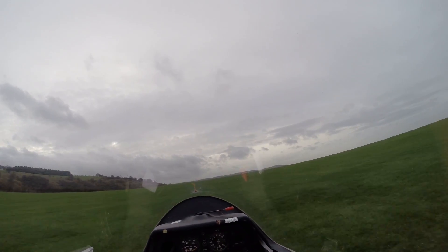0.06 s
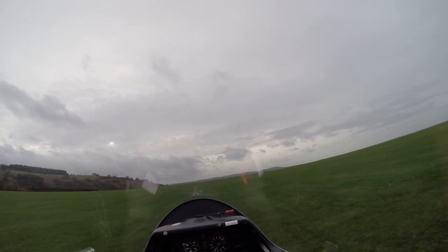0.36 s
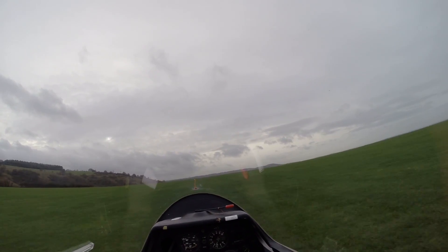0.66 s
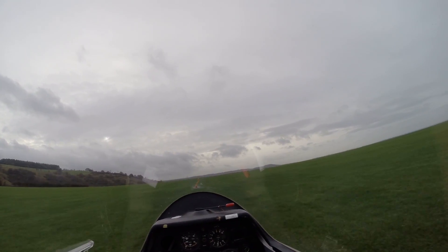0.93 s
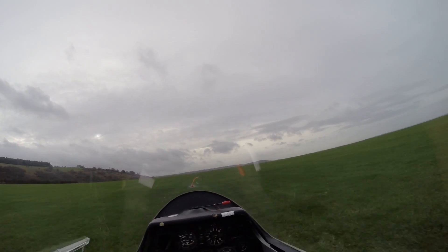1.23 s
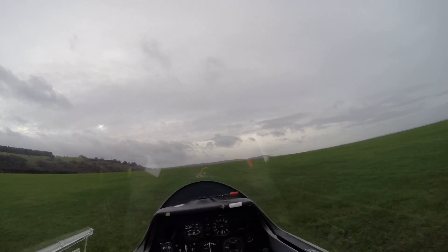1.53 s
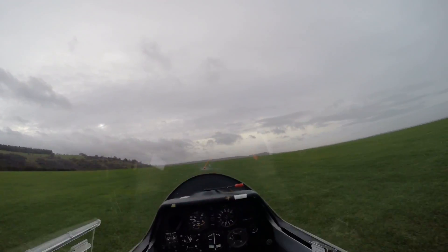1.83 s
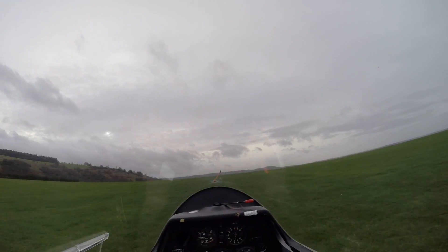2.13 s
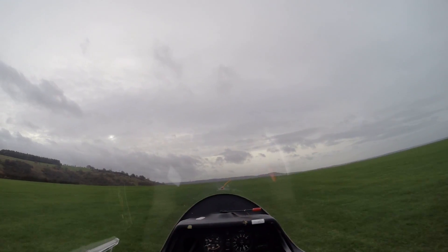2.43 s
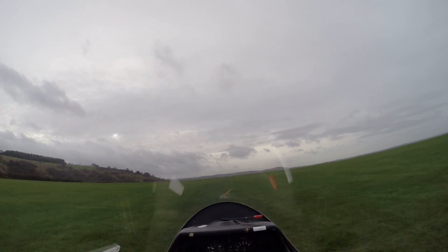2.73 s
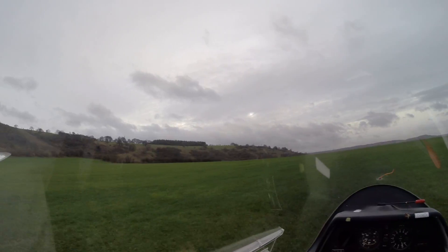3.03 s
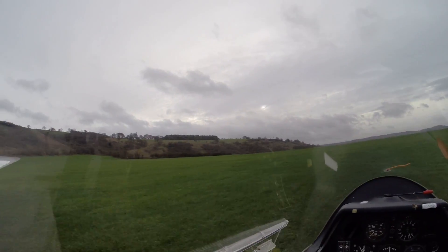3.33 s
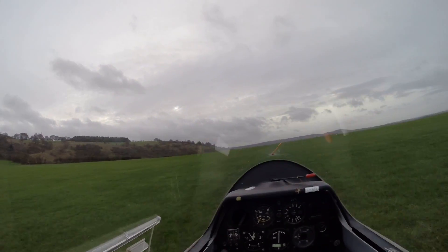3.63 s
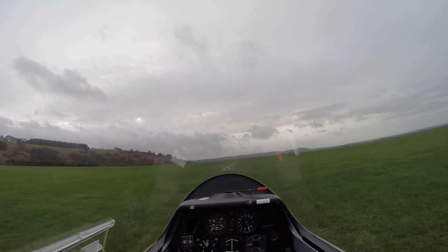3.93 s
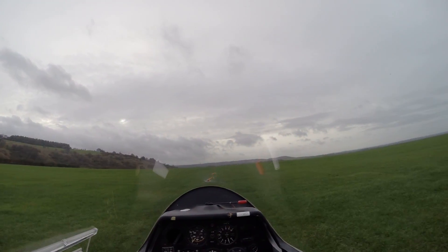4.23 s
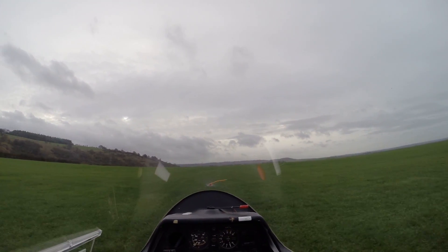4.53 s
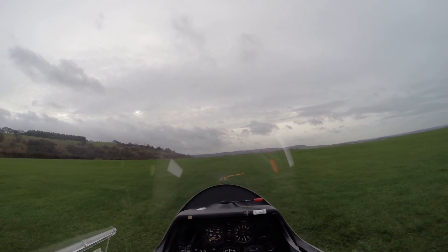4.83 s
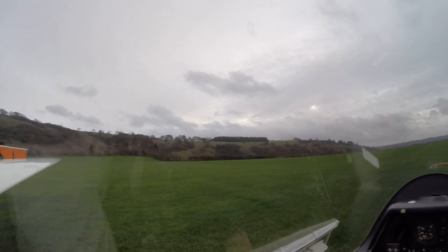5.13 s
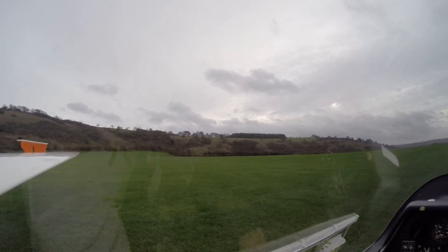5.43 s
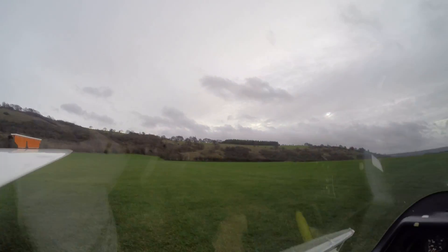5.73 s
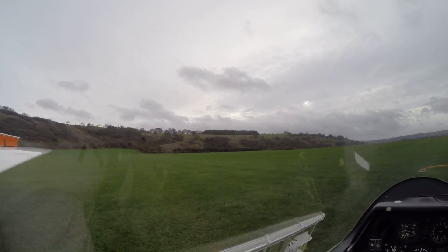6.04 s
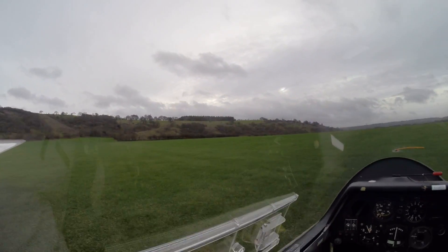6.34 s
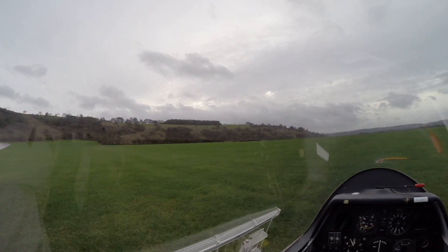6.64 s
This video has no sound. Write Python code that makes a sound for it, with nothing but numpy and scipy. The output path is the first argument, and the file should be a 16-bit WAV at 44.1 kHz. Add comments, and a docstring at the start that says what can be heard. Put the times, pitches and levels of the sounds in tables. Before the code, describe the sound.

A glider judders over turf, skips clear for a moment and settles back with deep thumps and a hollow drone, heard close up from the cockpit. Irregular clacks, dull knocks and small metallic ticks come from the canopy and loose parts, over a soft hiss of air. The bumps gradually become lighter as it slows, and grass rubs the underside near the end while the rattling carries on.

```python
"""Glider rolling over grass

Heard from the cockpit, the wheel rolls slowly over an airfield and shakes the hollow body (the
fuselage), which rumbles and booms over the bumps. Loose fittings chatter, the control linkage knocks
and the canopy frame clacks. Grass rubs along the belly, and air hisses softly past."""
import sys
import numpy as np
from scipy import signal
from scipy.io import wavfile
from scipy.ndimage import uniform_filter1d

SR = 44100
rng = np.random.default_rng(int(sys.argv[2]) if len(sys.argv) > 2 else 0)


def store_wav(level_fs):
    """Save 16-bit WAV to argv[1]."""
    pcm = np.round(np.clip(np.atleast_2d(level_fs), -1, 1) * 32767)
    wavfile.write(sys.argv[1], SR, pcm.T.astype(np.int16))


N = 294147

# A law says how a part follows the shaking: (level at SHAKE_REF_DB [dB], rise per dB of shaking [dB])
CABIN_LAW, SKIN_LAW, HEAVE_LAW = (-32, 1.02), (-36, 0.91), (-30, 0.63)
RATTLE_LAW, CLACK_LAW, KNOCK_LAW, RASP_LAW = (-47.5, 1.13), (-41.5, 0.41), (-42, 0.56), (-55, 1)
SHAKE_REF_DB = -28

# humps under the wheel: (start [s], length [s], wheel heave [dB], fuselage drone [dB], rattle [dB])
BUMPS = [(0.03, 0.51, -43, -26.5, -39), (0.52, 0.31, -45, -34, -47), (0.99, 0.16, -30.5, -33, -45.5),
         (1.27, 0.18, -18.5, -22, -47), (1.56, 0.24, -25, -22.5, -34.5), (1.9, 0.28, -23.5, -25, -44),
         (2.17, 0.25, -27, -27, -72), (2.69, 0.13, -26.5, -30.5, -38.5), (3.15, 0.15, -39, -24.5, -57),
         (3.5, 0.13, -23.5, -29.5, -44), (3.95, 0.21, -33, -29, -45), (5.48, 0.14, -28, -43, -44)]
# the broad tone of the hollow fuselage: (frequency [Hz], gain [dB])
FUSELAGE_TONE = [(45, -50.5), (78, -9.5), (105, 1.5), (135, -1), (163, -7.5), (244, -8), (320, -9.5),
                 (400, -17), (500, -18.5), (680, -27.5), (1000, -30.5), (2600, -80)]
# the notes at which it rings: (frequency [Hz], width [Hz], boost [dB])
FUSELAGE_NOTES = [(103.9, 14.6, 6.5), (123, 20, 4.5), (197, 104, 0.5), (237, 19.3, 7), (255.7, 7.8, 9.5),
                  (302, 4.7, 4), (448, 21.4, 8)]
def fuselage(tufts_per_s=260, spread_db=2.0, grit=0.03, lurch_db=1.5, cabin_top_hz=150):
    """Tufts of grass thump the tyre; the cabin booms deeply and the skin drones above it."""
    tufts = rng.random(N) < tufts_per_s / SR
    thumps = tufts * amp(spread_db * rng.standard_normal(N)) * rng.choice([-1, 1], N)
    force = thumps + grit * rng.standard_normal(N)
    drone = through(force, response(FUSELAGE_TONE, FUSELAGE_NOTES, size=16384))
    cabin = signal.sosfiltfilt(signal.butter(6, cabin_top_hz, fs=SR, output="sos"), drone)
    skin = drone - cabin
    out = np.zeros(N)
    for part, law, bump_db in (cabin, CABIN_LAW, -2), (skin, SKIN_LAW, -4):
        rolling = shaking(law) * amp(lurch_db * lurches())
        bumping = amp(bump_db) * swells(BUMPS, column=3)
        out += np.hypot(rolling, bumping) * steady(part, size=3000)  # hypot adds their powers
    return out


# the deep tone of the bouncing wheel: (frequency [Hz], gain [dB])
WHEEL_TONE = [(5, -37), (12, -1.5), (22, -3.5), (37, -1), (52, -8.5), (65, -6), (82, -14), (130, -22.5),
              (300, -87)]
def wheel(lurch_db=2.0):
    """The wheel heaves up and down over the turf, and the whole glider follows."""
    heave = through(rng.standard_normal(N), response(WHEEL_TONE, size=16384))
    rolling = shaking(HEAVE_LAW) * amp(lurch_db * lurches())
    return np.hypot(rolling, swells(BUMPS, column=2)) * steady(heave, size=4500)


# the tyre hits a hard ridge: (time [s], level [dB])
THUDS = [(1.296, -15), (1.361, -16), (1.638, -11), (1.714, -12), (1.986, -7.5), (2.329, -12.5), (3.96, -16),
         (4.926, -22), (5.543, -18), (5.934, -21), (6.199, -19)]
def thuds(hz=40, peak_s=0.012):
    """The glider bounces on its tyre for a cycle or two."""
    out, t = np.zeros(N), np.arange(SR // 4) / SR
    rise_and_fall = t / peak_s * np.exp(1 - t / peak_s)
    for s, db in THUDS:
        add(out, s, amp(db) * rise_and_fall * np.sin(2 * np.pi * hz * t))
    return out


# jolts that make the hollow shell boom: (time [s], level [dB], boosted note [Hz])
BOOMS = [(0.203, -21, 280), (0.546, -25.5, 342), (0.635, -30.5, 280), (1.274, -22.5, 219),
         (1.925, -27, 304), (2.727, -24.5, 300), (3.18, -32, 240), (3.558, -27, 286), (4.667, -36.5, 223),
         (5.489, -29, 231), (5.886, -34.5, 446), (6.012, -36, 250), (6.137, -39, 520)]
# the dull tone of the panels: (frequency [Hz], gain [dB])
PANEL_TONE = [(90, -15.5), (200, 6), (540, -3.5), (800, -14.5), (2000, -52)]
def panels(note_db=4):
    """A jolt shakes many panels at once: a hollow thump around one broad note."""
    out = np.zeros(N)
    for s, db, hz in BOOMS:
        body = response(PANEL_TONE, [(hz, hz / 2, note_db)])
        add(out, s, amp(db) * strike(body, ring_s=0.11, contact=1, rise_s=0.0044, peak_size=600))
    return out


# the fuselage judders until the wheel lifts: (time [s], level [dB])
JUDDER = [(0.0, -25.5), (0.33, -22.5), (0.5, -50), (0.8, -100)]
def judder(hz=108, waver=0.0693, uneven_db=4.0):
    """The fuselage drones at its lowest note, wavering in pitch and strength."""
    cycles = np.cumsum(hz * (1 + waver * lurches())) / SR
    drone = amp(uneven_db * lurches()) * np.sin(2 * np.pi * cycles)
    return level(JUDDER) * unit(drone)


# the tone of the loose parts: (frequency [Hz], gain [dB])
CHATTER_TONE = [(350, -15), (620, 1), (900, -3.5), (1200, -6), (1500, 6), (1850, -6.5), (2500, -4),
                (3200, -6.5), (3700, -2), (4300, -16.5), (5250, -19.5), (5950, -14.5), (8000, -31.5),
                (15000, -40)]
# the tone of the hard little clicks: (frequency [Hz], gain [dB])
CLICK_TONE = [(2500, -14), (6000, 8.5), (7500, 2.5), (9300, -1), (11500, -7.5), (15000, -12)]
def chatter(swish_db=-5, click_db=-18.0, lurch_db=2.3):
    """Loose parts tap at random over the swish of the grass; hard bits click on their own."""
    rolling = shaking(RATTLE_LAW) * amp(lurch_db * lurches())
    strength = np.hypot(rolling, swells(BUMPS, column=4))
    tapping = unit(taps(per_s=90, spread_db=1.5, ring_s=0.044))
    swish = amp(swish_db) * rng.standard_normal(N)
    rattle = through(tapping + swish, response(CHATTER_TONE))
    clicks = through(taps(per_s=60, spread_db=2.5, ring_s=0.026), response(CLICK_TONE))
    return strength * (unit(rattle) + amp(click_db) * unit(clicks))


# the loudest clacks: (time [s], level [dB], edge level [dB], note of the spot [Hz], ring time [s])
CLACKS = [(0.117, -33.5, -40, 2790, 0.09), (0.2, -29, -38, 1610, 0.071), (0.2209, -30.5, -37, 1820, 0.068),
          (1.0206, -30, -41, 3500, 0.073), (1.1449, -32, -43, 3500, 0.043),
          (1.2583, -32.5, -38, 3670, 0.14), (1.2785, -27.5, -38, 3730, 0.11),
          (1.3112, -27.5, -48, 2810, 0.13), (1.425, -34, -42, 2740, 0.11),
          (1.6455, -24.5, -39, 2530, 0.077), (2.0757, -34, -39.5, 4030, 0.1),
          (2.6266, -32, -65, 3500, 0.026), (2.768, -42.5, -49, 3500, 0.045),
          (2.7874, -25.5, -37.5, 3740, 0.041), (3.1765, -24.5, -55, 3450, 0.075),
          (3.24, -38, -43, 3550, 0.071), (3.3344, -35, -38, 2570, 0.064), (3.5227, -34, -42, 1600, 0.075),
          (3.745, -32, -39, 1690, 0.039), (3.7644, -34, -45, 1490, 0.19), (3.9853, -36, -44, 1510, 0.11),
          (4.1224, -35, -52, 1550, 0.06), (4.1437, -31.5, -64, 2430, 0.048), (4.339, -31, -53, 2400, 0.085),
          (4.385, -37, -43, 2600, 0.19), (4.6663, -32, -43, 2780, 0.049), (4.808, -37, -42.5, 2650, 0.13),
          (5.1289, -35.5, -45, 2160, 0.048), (5.2082, -37, -56, 2160, 0.077),
          (5.2777, -35, -44, 2200, 0.064), (5.4143, -38, -68, 3200, 0.078),
          (5.4892, -31, -35.5, 3080, 0.075), (5.5283, -31, -53, 3060, 0.085),
          (5.668, -29.5, -56, 3280, 0.12), (5.7815, -33, -40.5, 1980, 0.078),
          (5.8246, -34.5, -39, 2130, 0.052), (5.885, -27.5, -36.5, 2020, 0.079),
          (6.0127, -28.5, -39, 2650, 0.069), (6.136, -28.5, -37.5, 2280, 0.11),
          (6.278, -30, -43, 1540, 0.071), (6.4208, -40.5, -42.5, 2580, 0.27),
          (6.5515, -39, -44, 2560, 0.17)]
# the tone of the canopy frame: (frequency [Hz], gain [dB])
FRAME_TONE = [(150, -1), (330, 5), (700, 2), (950, -1), (1200, -1), (1500, 4), (2000, -3), (2450, -1),
              (3000, -4), (3650, -1), (4200, -18.5), (6000, -11), (8000, -50)]
# the bright tone of a hard edge: (frequency [Hz], gain [dB])
EDGE_TONE = [(1000, -52), (3000, 14.5), (3600, 13), (4300, 7.5), (5200, 3.5), (6200, 9), (7500, -4.5),
             (9000, -2.5), (11000, -9.5), (15000, -26)]
def canopy(spot_db=6, spot_width_hz=450, spot_range_hz=(1480, 3730), weak_edge_db=-11, weak_ring_s=0.07):
    """The frame jumps in its seat: each struck spot has its own note, and the hard edge rings too."""
    out, edge = np.zeros(N), response(EDGE_TONE)
    weaker = [(s, db, db + weak_edge_db, rng.uniform(*spot_range_hz), weak_ring_s)
              for s, db in weak_hits(CLACK_LAW, per_s=5)]
    for s, db, edge_db, hz, ring_s in list(CLACKS) + weaker:
        frame = response(FRAME_TONE, [(hz, spot_width_hz, spot_db)])
        add(out, s, amp(db) * strike(frame, ring_s, contact=5.4, rise_s=0.0029))
        add(out, s, amp(edge_db) * strike(edge, ring_s=0.062, contact=2.2, rise_s=0.00021))
    return out


# the loudest knocks of the control linkage: (time [s], level [dB])
KNOCKS = [(0.4208, -32.5), (0.487, -39.5), (1.0024, -35.5), (1.103, -40), (1.3128, -25.5), (1.916, -32),
          (2.4042, -33), (2.4808, -33), (2.5029, -34), (2.6772, -32.5), (3.3745, -27), (3.405, -28.5),
          (3.457, -30.5), (3.6167, -41), (4.007, -38), (4.277, -41.5), (4.868, -33.5), (4.923, -42),
          (4.9382, -39), (4.9746, -35.5), (5.024, -38), (5.117, -42), (5.449, -40.5), (5.6875, -29.5),
          (6.0027, -29), (6.122, -34), (6.212, -33.5)]
# the tone of a typical joint: (frequency [Hz], gain [dB])
JOINT_TONE = [(200, -56), (700, -3), (1100, -3.5), (1330, 4.5), (1560, 10), (1850, -16.5), (2600, -20),
              (3600, -21), (4200, -24), (6200, -31), (8000, -53)]
def linkage(click_db=-8.5):
    """Slack joints knock with a click and a dull ring, each tuned a little differently."""
    out, click = np.zeros(N), response(CHATTER_TONE)
    for s, db in list(KNOCKS) + weak_hits(KNOCK_LAW, per_s=12):
        tune = rng.uniform(0.94, 1.06)
        joint = response([(hz * tune, gain) for hz, gain in JOINT_TONE])
        add(out, s, amp(db) * strike(joint, ring_s=0.032, contact=9))
        add(out, s, amp(db + click_db) * strike(click, ring_s=0.04, contact=4))
    return out


# small metal fittings tick: (time [s], level [dB])
TICKS = [(0.0466, -35.5), (0.0854, -33), (0.2486, -38), (1.3018, -31.5), (1.505, -40), (1.758, -39.5),
         (2.0514, -42), (2.116, -41), (2.324, -41.5), (3.2184, -38.5), (3.377, -50), (3.402, -42),
         (3.8254, -38.5), (3.8598, -38), (3.888, -39), (4.86, -44), (5.179, -44.5), (5.3632, -43.5),
         (5.5248, -36), (5.647, -42.5), (5.688, -47), (6.575, -46)]
# light metal parts ping: (time [s], pitch [Hz], level [dB])
PINGS = [(1.503, 10852, -50.5), (6.138, 6976, -46)]
def fittings(note_range_hz=(7000, 11100), note_width_hz=500, note_db=8, ping_ring_s=0.094):
    """Small metal parts tick, each with its own bright ring; a few ping with one clear note."""
    out, t = np.zeros(N), np.arange(6000) / SR
    for s, db in TICKS:
        part = response(EDGE_TONE, [(rng.uniform(*note_range_hz), note_width_hz, note_db)])
        add(out, s, amp(db) * strike(part, ring_s=0.086, contact=7.0))
    for s, hz, db in PINGS:
        add(out, s, amp(db - 60 * t / ping_ring_s) * np.sin(2 * np.pi * hz * t))
    return out


# spells of hard shaking: (start [s], length [s], level [dB])
CRUNCHES = [(0.08, 0.17, -40), (1.57, 0.62, -50.5), (1.89, 0.24, -47), (3.1, 0.31, -50.5)]
def crunch():
    """Small hard parts crunch together in a dense, bright crackle."""
    crackle = through(taps(per_s=130, spread_db=5, ring_s=0.028), response(EDGE_TONE))
    return swells(CRUNCHES) * steady(crackle, size=2500)


# dry snaps: (time [s], level [dB])
SNAPS = [(1.1444, -47), (5.2777, -43), (5.648, -48), (5.687, -49), (6.0023, -47)]
# their sharp tone: (frequency [Hz], gain [dB])
SNAP_TONE = [(1500, -18), (4000, 1), (9000, -2), (15000, -12)]
def snaps():
    """Hard parts meet with almost no ring."""
    out, body = np.zeros(N), response(SNAP_TONE)
    for s, db in SNAPS:
        add(out, s, amp(db) * strike(body, ring_s=0.0088, contact=9.3))
    return out


# the belly drags through longer grass: (start [s], length [s], level [dB])
DRAGS = [(1.88, 0.18, -38.5), (5.66, 0.83, -45.5), (6.25, 0.76, -56.5)]
# the tone of that rubbing: (frequency [Hz], gain [dB])
RASP_TONE = [(300, -11), (700, 1.5), (1200, 0), (1700, 2), (2050, 4.5), (2450, -5), (2800, 1.5),
             (3700, -23), (4500, -10), (15000, -39.5)]
def belly():
    """Stalks and grit rub along the glider's underside in a fine rasp."""
    rasp = through(taps(per_s=840, spread_db=0.5, ring_s=0.11), response(RASP_TONE))
    return np.hypot(shaking(RASP_LAW), swells(DRAGS)) * unit(rasp)


# the tone of the wind around the canopy: (frequency [Hz], gain [dB])
WIND_TONE = [(100, -3), (300, 12), (600, 12.5), (1100, -12), (1500, 1), (2000, -12), (2900, 6), (4200, -10),
             (5800, -12), (8000, -13.5), (15000, -20)]
# a gust blows through a gap in the canopy: (time [s], level [dB])
GUST = [(0.2, -57), (0.58, -53), (0.95, -58), (1.25, -55.5), (2.9, -82)]
# the tone of its hiss: (frequency [Hz], gain [dB])
GAP_TONE = [(1000, -22), (2000, -7), (2850, 0), (3300, -5), (3700, -4), (4200, -14), (4650, -7),
            (5050, -18), (5750, -10), (6400, -18), (8000, -26), (15000, -40)]
# the whistling notes of the gap: (frequency [Hz], width [Hz], boost [dB])
WHISTLES = [(2940, 120, 2), (4680, 200, 6.5), (5800, 200, 4)]
def air(wind_db=-57.5, flutter_db=3):
    """Soft wind washes over the canopy; a gust hisses in its gap with notes that come and go."""
    wind = amp(wind_db) * unit(through(rng.standard_normal(N), response(WIND_TONE)))
    jet = rng.standard_normal(N)
    hiss = through(jet, response(GAP_TONE))
    notes = through(jet, response(GAP_TONE, WHISTLES)) - hiss
    flutter = np.minimum(amp(flutter_db * lurches()) / 2, 1)
    return wind + level(GUST) * unit(hiss + notes * flutter)


# turf shakes the glider, which skips clear near 0.9 s, settles, then slows: (time [s], level [dB])
SHAKE = [(0.0, -16.5), (0.26, -28), (0.47, -41.5), (0.74, -44), (0.92, -50), (1.0, -32.5), (1.23, -37),
         (1.29, -23.5), (2.42, -25), (2.6, -32.5), (2.75, -23.5), (3.25, -21.5), (4.08, -29), (4.2, -32.5),
         (5.1, -32), (5.35, -36), (5.7, -33), (6.67, -37)]
def shaking(law):
    """How strongly a part sounds at each moment as the turf shakes it."""
    db, slope = law
    return amp(db) * (level(SHAKE) / amp(SHAKE_REF_DB)) ** slope


def weak_hits(law, per_s, spread_db=4, tries=160):
    """Random hits that thin out as the shaking dies down: (time [s], level [dB])."""
    when, chance, size = rng.random((tries, 3)).T
    at = (when * N).astype(int)
    busy = np.minimum(np.sqrt(level(SHAKE)[at] / amp(SHAKE_REF_DB)), 1)
    happens = chance < busy * per_s * N / SR / tries
    db = 20 * np.log10(shaking(law)[at]) + spread_db * (2 * size - 1)
    return list(zip(at[happens] / SR, db[happens]))


def lurches():
    """A slow random wobble, like uneven turf, with a typical size of 1."""
    return unit(smooth(rng.standard_normal(N), size=2200))


def swells(rows, column=2, peak_share=0.14):
    """One arch per row, rising fast and falling slowly, as high as the chosen dB column."""
    out, t = np.zeros(N), np.arange(N) / SR
    for row in rows:
        start_s, length_s = row[:2]
        progress = np.interp((t - start_s) / length_s, [0, peak_share, 1], [0, .5, 1])
        out += amp(row[column]) * np.sin(np.pi * progress)
    return out


def strike(body, ring_s, contact, rise_s=0.0, peak_size=176):
    """One hit on a body: a first contact, then a shiver that builds and fades 60 dB in ring_s."""
    t = np.arange(8000) / SR
    force = rng.standard_normal(len(t)) * amp(-60 * t / ring_s)
    force *= 1 - np.exp(-t / (rise_s + 1e-9))
    force[0] += contact
    hit = through(force, body)
    peak_power = uniform_filter1d(hit ** 2, peak_size).max()
    return hit / np.sqrt(peak_power + 1e-20)  # the loudest stretch gets strength 1


def taps(per_s, spread_db, ring_s):
    """Random taps of uneven size, each leaving a short shiver of noise."""
    hits = rng.random(N) < per_s / SR
    sizes = hits * amp(spread_db * np.minimum(rng.exponential(1, N), 3))
    fade = amp(-60 * np.arange(5000) / SR / ring_s)
    power = abs(through(sizes ** 2, fade ** 2))
    return np.sqrt(power) * rng.standard_normal(N)


def response(tone, notes=(), size=2048):
    """How a body with this tone and these ringing notes answers one sharp tap."""
    hz = np.fft.rfftfreq(size, 1 / SR)
    tone_hz, tone_db = np.transpose(tone)
    db = np.interp(np.log(hz + 1), np.log(tone_hz + 1), tone_db)
    db += sum(boost / (1 + (2 * (hz - centre) / width) ** 2) for centre, width, boost in notes)
    mirrored_db = np.r_[db, db[-2:0:-1]]
    log_gain = np.log(amp(np.maximum(mirrored_db, -100)))
    spectrum = np.exp(np.conj(signal.hilbert(log_gain)))  # nothing sounds before the tap
    return np.fft.ifft(spectrum).real[:size // 2]


def through(force, body):
    """Plays a force through a body."""
    return signal.fftconvolve(force, body)[:len(force)]


def level(curve):
    """Turns (time [s], level [dB]) points into a gain for every sample."""
    times, db = np.transpose(curve)
    return amp(np.interp(np.arange(N) / SR, times, db))


def smooth(x, size):
    """Averages twice over this many samples."""
    return uniform_filter1d(uniform_filter1d(x, size), size)


def steady(x, size):
    """Holds the strength of a noise near 1 over stretches of this many samples."""
    return x / np.sqrt(smooth(x ** 2, size) + 1e-20)


def unit(x):
    """Scales a signal to an average strength (rms) of 1."""
    return x / np.sqrt(np.mean(x ** 2) + 1e-20)


def amp(db):
    """Turns decibels into a gain."""
    return 10 ** (np.asarray(db) / 20)


def add(mix, s, sound):
    """Mixes a sound in at s seconds."""
    part = mix[max(round(s * SR), 0):][:len(sound)]
    part += sound[:len(part)]


def scene():
    """Everything as it sounds in the cockpit, in one channel."""
    rumble = wheel() + thuds() + fuselage() + judder() + panels()
    rattle = chatter() + crunch() + linkage() + canopy() + fittings() + snaps()
    return (rumble + rattle + belly() + air())[None]


def record(dry, cutoff_hz=15300):
    """Cuts away the very highest treble."""
    low_pass = signal.firwin(511, cutoff_hz, window=("kaiser", 9), fs=SR)
    return signal.oaconvolve(dry, low_pass[None], "same")


dry = scene()
out = record(dry)
store_wav(out)
```